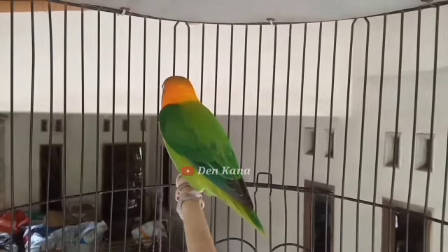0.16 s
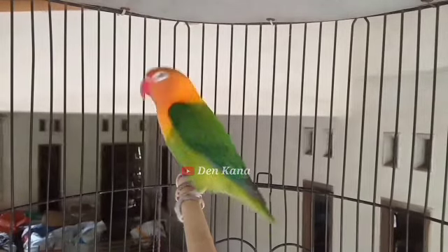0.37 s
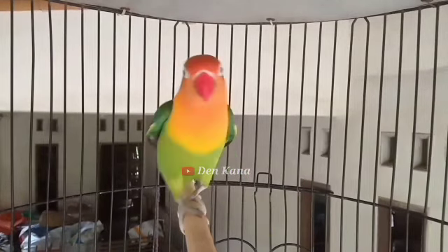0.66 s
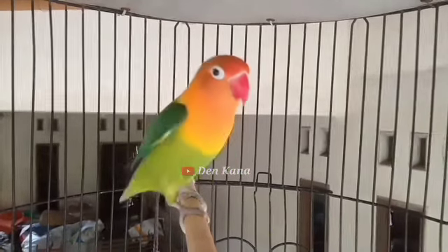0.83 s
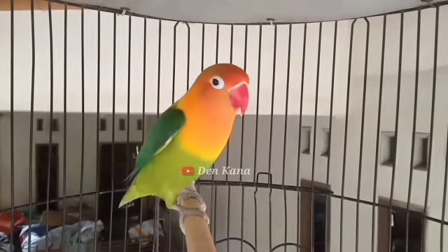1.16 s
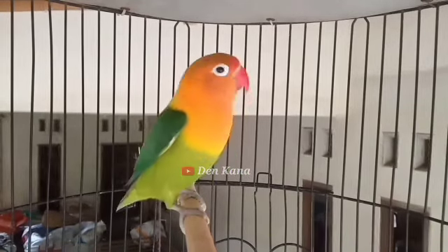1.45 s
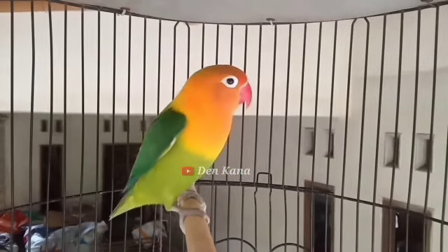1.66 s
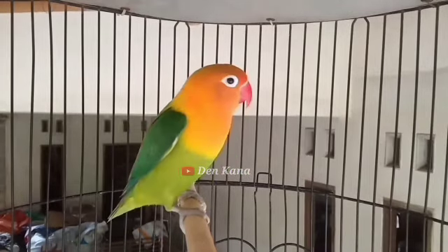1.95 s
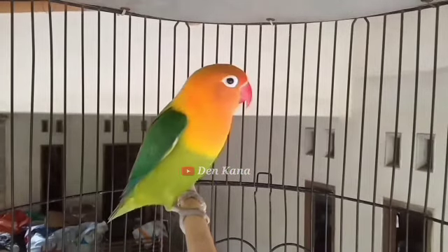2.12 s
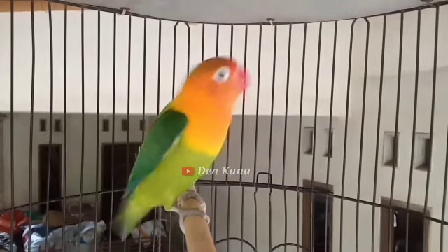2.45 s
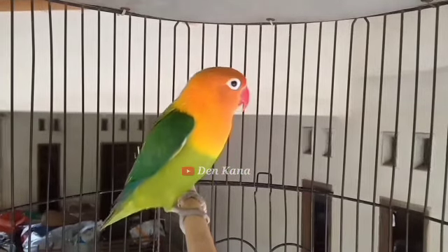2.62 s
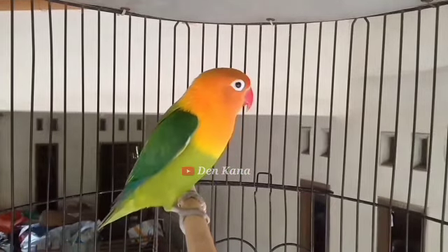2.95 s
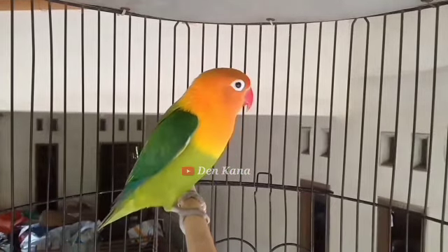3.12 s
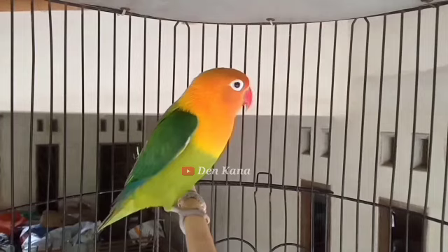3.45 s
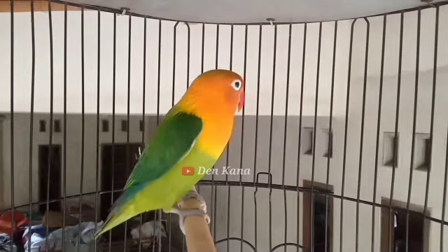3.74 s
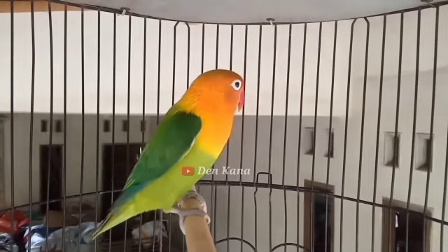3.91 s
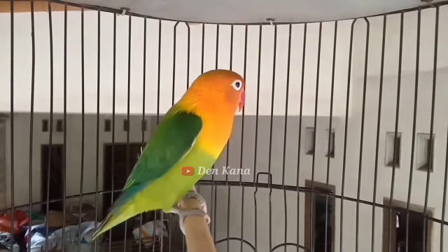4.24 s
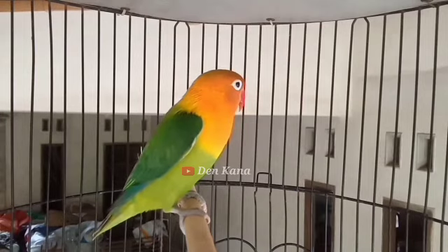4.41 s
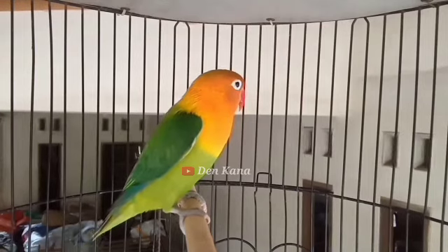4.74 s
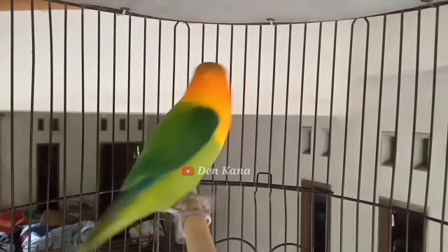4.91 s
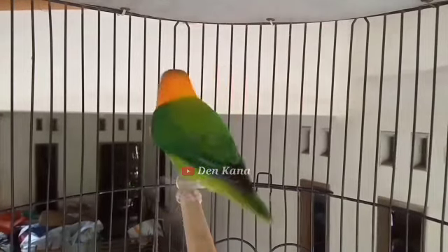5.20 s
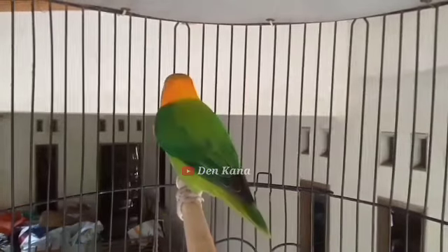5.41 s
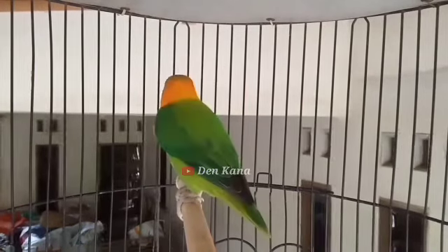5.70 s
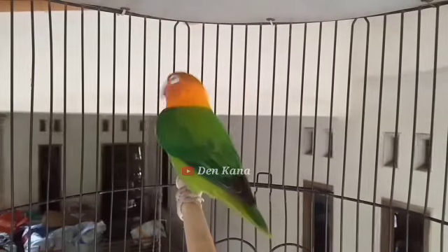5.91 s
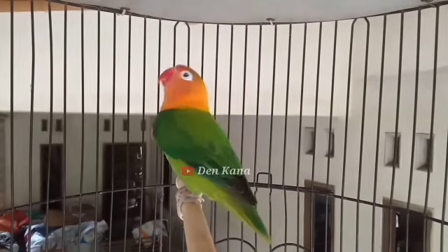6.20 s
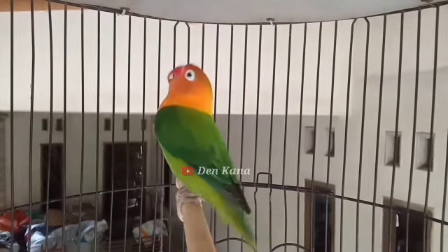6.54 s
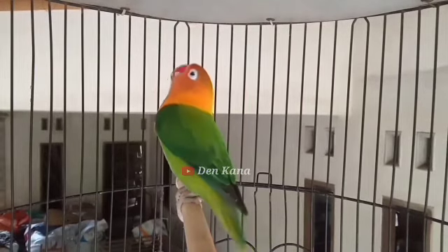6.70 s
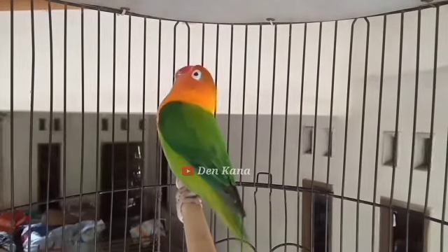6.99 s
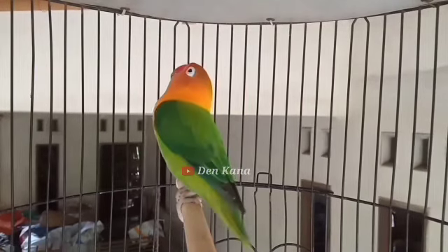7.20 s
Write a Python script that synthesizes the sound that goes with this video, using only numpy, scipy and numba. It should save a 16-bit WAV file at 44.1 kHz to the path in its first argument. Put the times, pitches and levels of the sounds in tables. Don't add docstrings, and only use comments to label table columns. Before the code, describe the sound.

A close phone microphone picks up a caged lovebird in a hard, echoing room. Under everything lie quiet house rumble, a wavering low drone around 140-170 Hz, faint hiss and insect-thin high tones. At 0.55 s comes a tiny, piercing chirp around 5 kHz, with a bright tail lasting over half a second; faint claw ticks follow near 0.8 s. A second, rougher chirp sweeps upward at 1.6 s, a third strikes at 2.57 s and a fourth at 3.7 s, each only some tens of milliseconds long. From about 3 s a distant machine's thin whine swells very faintly, strongest near 5.5 s, gone by 6.1 s. Small ticks sound around 5.0 and 5.3 s. At 6.1 s a quick double note leads, from 6.3 s, into rapid, raspy chatter, about sixteen short rising strokes per second with softer grace clicks, slightly duller, continuing until the end at about 7.4 s.

```python
import sys
import numpy as np
from scipy import signal
from scipy.fft import rfft, irfft
from scipy.io import wavfile
from scipy.ndimage import uniform_filter1d, minimum_filter1d
from numba import njit

SR = 44100
rng = np.random.default_rng(int(sys.argv[2]) if len(sys.argv) > 2 else 0)


def transcribe(signal):
    frames = np.atleast_2d(signal).T
    limited = np.clip(frames, -1, 1)
    pcm = np.round(limited * 32767).astype(np.int16)
    wavfile.write(sys.argv[1], SR, pcm)


def voltage_ratio(level):
    return 10 ** (np.asarray(level, float) / 20)


N = 324576
TIME = np.arange(N) / SR

# [f/Hz, density/dB]
HOUSE_COLOUR = [(15, -62), (25, -51), (76, 5), (206, -5), (373, -6.5), (439, -7), (734, -11), (1290, -12),
                (2990, -20.5), (3430, -17.5), (4250, -26.5), (7920, -25), (11600, -40), (13600, -32.5),
                (16000, -62)]
# [t/s, level/dB]
HOUSE_LEVEL = [(0, -54), (2.4, -55), (3.3, -55), (4.2, -56), (5.8, -57.5), (7.36, -62.5)]
# [start t/s, end t/s, start f/Hz, end f/Hz, level/dB]
DRONE_SPELLS = [(0, 0.495, 167, 167, -61.5), (0.604, 1.407, 142, 142, -61), (1.522, 2.5, 167, 160.9, -59),
                (2.607, 3.446, 160, 155.8, -51.5), (3.455, 4.201, 155, 150.7, -61.5),
                (4.29, 5.104, 146, 139, -56.5), (5.303, 6.352, 162, 157.2, -60),
                (6.359, 7.398, 157, 158, -68)]
# [f/Hz, width/Hz, level/dB to the second chirp, level/dB after]
STEADY_TONES = [(204.6, 0.89, -61.5, -87.5), (354, 1.1, -75, -71.5), (416, 6.2, -63.5, -91),
                (447.6, 10, -62.5, -69.5), (3359, 33, -68.5, -72), (7900, 30, -76.5, -96.5),
                (10000, 20, -89.5, -98), (13160, 25, -90.5, -90), (13450, 40, -77, -75)]
# [f/Hz, level/dB]
MACHINE_LINES = [(2923, -72.5), (3074, -75), (3418, -80), (4070, -82.5), (5227, -89), (6837, -79),
                 (7434, -78), (8818, -74.5), (9216, -79), (10126, -81.5), (10460, -87.5), (11041, -81),
                 (11364, -87), (12080, -101), (13517, -89), (14153, -93.5)]
# [f/Hz, density/dB]
MACHINE_HISS = [(1180, -45), (2000, -22), (2620, -8.5), (3010, -3), (4940, -23), (8930, -11.5),
                (12700, -23.5), (13800, -15), (16000, -38)]
# [t/s, level/dB]
MACHINE_LEVEL = [
    (2.6, -79),
    (3.1, -67.5),
    (4, -64),
    (4.6, -63),
    (5.5, -59),
    (5.75, -66),
    (6.1, -80),
]
# [f/Hz, t60/s, level/dB]
ROOM_TAIL = [(1500, 0.62, -17), (2500, 1, -10), (4000, .75, -7), (5500, 0.62, -4), (8100, 0.59, -3.5),
             (8800, 0.66, -14), (13600, 0.25, -8.5)]
ROOM_SEND = [
    -3.15,
    -3.5,
    0.66,
    0.3,
    -0.28,
    -2.9,
]
ROOM_SEND_FROM = (0, 1.5, 2.4, 3.5, 6, 6.29)
# [delay/ms, share]
NEAR_ECHOES = [(.78, 0.062), (1.58, 0.59), (1.72, -0.22), (1.82, 0.46), (3.3, 0.1), (4.45, -0.17),
               (6.0, -0.18), (9.5, 0.13), (24.5, 0.14), (40.5, 0.048), (43.5, -0.052)]
# [t/s, peak level/dB, f/Hz]
CLAW_TICKS = [(0.519, -41, 1897), (.75, -51, 11860), (.82, -51, 11300), (0.841, -55, 11300),
              (2.540, -36.5, 2358), (2.569, -42.5, 1097), (3.703, -27.5, 1300), (1.614, -34, 2090),
              (5.018, -47, 9000), (5.27, -51, 9200)]
# [f/Hz, gain/dB]
UPPER_COLOUR = [(1000, -32), (2000, -12.5), (3500, -11), (5000, -9.5), (6200, -25), (7700, 4), (9000, -1.5),
                (11000, -6), (13000, 3.5), (15500, -10)]
HALF_PITCH_LINES = (-17, 0, -13)
# [t/s, length/ms, start f/Hz, end f/Hz, level/dB]
SUNG_NOTES = [(.5506, 9, 5840, 4330, -13), (.5556, 10.8, 5830, 5290, -14), (.5612, 6.7, 5340, 5570, -17.5),
              (1.6139, 8.1, 1916, 3014, -24.5), (1.617, 13, 3215, 3745, -27), (1.6207, 10, 4600, 5114, -14),
              (1.6258, 21.5, 5236, 4804, -15.5), (2.567, 5.7, 4500, 4990, -37.5),
              (2.5718, 4.8, 5000, 5060, -25.5), (2.5749, 24.7, 4630, 5442, -11),
              (3.7015, 10, 4830, 4826, -29.5), (3.708, 6, 4830, 5750, -24), (3.7118, 31, 4600, 5453, -11),
              (6.117, 7, 4010, 2100, -15.5), (6.1196, 17.8, 2260, 1734, -22.5)]
# [overtone level/dB, half-pitch lines level/dB]
NOTE_VOICES = [(-16, -22.5), (-14, -18.5), (-12, -30.5), (-7.5, 1), (18.5, -11.5), (-9, -18), (6, -32),
               (4.5, 20), (-6, -5.5), (1.5, -31.5), (-15, 10.5), (-9.5, -15), (-2.5, -28.5), (-5, -38),
               (8.5, -26)]
NOTE_ROUGHNESS = (.1, .07, .05, .5, .06, .07, .03, .18, .1, .03, .3, .2, .03, .08, .06)
# [t/s, length/ms, start f/Hz, top f/Hz, level/dB]
CHATTER_BEATS = [(6.1065, 3.44, 3280, 4960, -11.5), (6.2975, 3.9, 2260, 3450, -17),
                 (6.3573, 7.1, 1710, 4280, -14.5), (6.4185, 4.25, 2450, 4160, -14),
                 (6.4792, 4.1, 2860, 5500, -10.5), (6.5397, 6.5, 2110, 5500, -13),
                 (6.6024, 6.1, 3180, 3940, -11), (6.6659, 4.34, 1640, 4840, -12),
                 (6.7281, 4.9, 1730, 4540, -13), (6.794, 6.2, 1670, 4690, -11.5),
                 (6.855, 3.6, 1700, 4850, -14), (6.9199, 4.74, 2210, 3670, -15),
                 (7.0557, 3.3, 3010, 4050, -12), (7.1249, 4.7, 1720, 4080, -16),
                 (7.1899, 5.1, 3060, 3770, -12), (7.2612, 4.8, 1820, 4080, -15),
                 (7.3285, 3.9, 1710, 4080, -16.5), (6.4684, 3.4, 2700, 4500, -22.5),
                 (6.7156, 4.8, 3000, 5000, -20), (6.8444, 2.9, 2970, 4560, -14),
                 (6.9093, 3, 2720, 4370, -22), (7.178, 4.9, 3070, 4500, -16.5)]
# [t/s, length/ms, f/Hz, level/dB]
GRACE_STROKES = [(6.1022, 3, 2580, -14), (6.525, 8.7, 3060, -14), (6.5908, 4.8, 2645, -17.5),
                 (6.647, 5.6, 2510, -30.5), (6.654, 4.3, 2780, -19), (6.781, 3.3, 3100, -14),
                 (6.8403, 3, 2550, -23.5), (6.8505, 7.3, 2430, -22.5), (6.9635, 3.3, 2340, -40),
                 (6.9739, 3.4, 2600, -22), (6.9873, 4.4, 2500, -11.5), (7.0425, 3.6, 4260, -15.5),
                 (7.1067, 4.5, 2530, -27.5), (7.11, 9.3, 2984, -13), (7.163, 3.6, 2130, -28),
                 (7.237, 3.5, 2400, -25), (7.2437, 2.8, 2650, -26), (7.247, 3.8, 2980, -14),
                 (7.304, 5.7, 1970, -44), (7.31, 6, 2500, -25), (7.3156, 3.9, 2890, -18)]

HISS_DB, HISS_FOLLOWS, HISS_EARLY_DB, HISS_FADE_S = -59, 0.25, 3, 2.7
DRONE_FADE_S = 0.15
LINE_WIDTH = 0.0037
MACHINE_LINES_DB = -1
GAIN_TOP_DB, GAIN_RATIO, GAIN_ATTACK_S, GAIN_RELEASE_S = -29.5, 1.1, 0.003, 0.25
AWAY_S, AWAY_HZ, AWAY_SHARE, AWAY_ROOM_SHARE = 6, 7660, 0.64, 0.25
RASP_TOP_HZ, THROAT_HZ = 9000, 2090

NOTE_FALL_DB = -5
NOTE_ATTACK_MS, NOTE_RELEASE_MS, NOTE_SAG_DB_MS = 2.4, 3.5, -0.3953
GLIDE_SHARE = .22
OVERTONE_PEAK, OVERTONE_LATE_DB = 0.44, -12
ONSET_MS, ONSET_HALF_DB, ONSET_ROUGH = 3.5, 17, .3

CHATTER_DB, CHATTER_FALL_DB, CHATTER_HALF_DB, CHATTER_ROUGH = 0.5, -6, -16, .3
RASP_DB = -8.5
SCOOP, SCOOP_MS = .22, .8
GRACE_SAG = 0.018
# (pitch where both are equal/Hz, dB per kHz)
BEAT_OVERTONE, GRACE_OVERTONE, OVERTONE_FLOOR_DB = (2080, -8), (2580, -31), -11.5

SQUARE = 0.038
PEAK, LIMIT_MS = .68, 1.2
TOP_HZ = 15450


def curve(table, column):
    return np.interp(TIME, [row[0] for row in table], [row[column] for row in table])


def unit(x):
    return x / np.sqrt(np.mean(x ** 2))


def lowpass(x, hz):
    return signal.sosfilt(signal.butter(2, hz, fs=SR, output="sos"), x)


def coloured(points):
    hz, db = np.transpose(points)
    bins = np.log(np.fft.rfftfreq(N, 1 / SR) + 1)
    gain = voltage_ratio(np.interp(bins, np.log(hz), db))
    return unit(irfft(rfft(rng.standard_normal(N)) * gain, N))


def ring(hz, width):
    bins = np.fft.rfftfreq(N, 1 / SR)
    resonance = 1 / (1 + (2 * (bins - hz) / width) ** 2)
    return unit(irfft(rfft(rng.standard_normal(N)) * resonance, N))


def walk(rate, count=N):
    k = max(int(SR / rate), 1)
    steps = np.repeat(rng.standard_normal(count // k + 1), k)
    return 1.845 * uniform_filter1d(uniform_filter1d(steps, k), k)[:count]


def house_noise():
    air = coloured(HOUSE_COLOUR)
    low = lowpass(air, 600)
    house_db = curve(HOUSE_LEVEL, column=1)
    early_db = HISS_EARLY_DB * np.exp(-TIME / HISS_FADE_S)
    hiss_db = HISS_DB + HISS_FOLLOWS * (house_db - house_db.mean()) + early_db
    rumble = unit(low) * voltage_ratio(house_db + 0.48 * walk(1.6))
    return rumble + unit(air - low) * voltage_ratio(hiss_db + 0.59 * walk(20.0))


def drone():
    out = np.zeros(N)
    waver_hz, flicker_db = 1.4 * walk(8), 2.1 * walk(29)
    for start, end, start_hz, end_hz, db in DRONE_SPELLS:
        hz = np.interp(TIME, [start, end], [start_hz, end_hz]) + waver_hz
        phase = 2 * np.pi * np.cumsum(hz) / SR
        fade = np.clip(np.minimum(TIME - start, end - TIME) / DRONE_FADE_S + .5, 0, 1)
        out += np.sqrt(2) * np.sin(phase) * fade * voltage_ratio(db + flicker_db)
    return out


def steady_tones():
    out = np.zeros(N)
    for hz, width, early_db, late_db in STEADY_TONES:
        out += ring(hz, width) * voltage_ratio(np.interp(TIME, [1.55, 1.7], [early_db, late_db]))
    return out


def far_machine():
    lines = unit(sum(voltage_ratio(db) * ring(hz, LINE_WIDTH * hz) for hz, db in MACHINE_LINES))
    hiss = coloured(MACHINE_HISS) * voltage_ratio(.7 * walk(0.64))
    swell = voltage_ratio(curve(MACHINE_LEVEL, column=1))
    return swell * machine_mix(lines, hiss)


def room_response():
    t = TIME[:SR]
    response = np.zeros(SR)
    unevenness_db = 8 * rng.standard_normal(SR) * np.exp(-t / .04)
    spectrum = rfft(rng.standard_normal(SR) * voltage_ratio(unevenness_db))
    place = np.log(np.fft.rfftfreq(SR, 1 / SR) + 1)
    centres = np.log([row[0] for row in ROOM_TAIL])
    for k, (hz, t60, db) in enumerate(ROOM_TAIL):
        share = np.interp(place, centres, np.arange(len(ROOM_TAIL)) == k)
        band = irfft(spectrum * share, SR)
        fade = np.exp(-np.log(1000) * t / t60) * (1 - np.exp(-t / 0.0098))
        response += voltage_ratio(db) * band * fade / np.sqrt(np.sum(fade ** 2))
    return response


def near_response():
    response = np.zeros(2048)
    response[0] = 1
    for ms, share in NEAR_ECHOES:
        response += share * np.sinc(np.arange(2048) - ms * SR / 1000)
    return response


@njit
def follow(size, attack, release):
    out, e = np.empty(len(size)), 0.
    for i in range(len(size)):
        e += (size[i] - e) * (attack if size[i] > e else release)
        out[i] = e
    return out


def gain_control(bird):
    heard = follow(np.abs(bird), 1 / (GAIN_ATTACK_S * SR), 1 / (GAIN_RELEASE_S * SR))
    return np.minimum(1, voltage_ratio(GAIN_TOP_DB) / (heard + 1e-9)) ** (1 - 1 / GAIN_RATIO)


def ticks():
    out, t = np.zeros(N), TIME[:400]
    for s, db, hz in CLAW_TICKS:
        edges = [hz / 2.5, min(hz * 1.6, .4 * SR)]
        band = signal.butter(2, edges, "band", fs=SR, output="sos")
        burst = signal.sosfilt(band, rng.standard_normal(len(t)))
        out[int(s * SR):][:len(t)] += voltage_ratio(db) * unit(burst) * np.exp(-t / 0.001)
    return out


def upper_gain(hz):
    beak_hz, db = np.transpose(UPPER_COLOUR)
    return voltage_ratio(np.interp(np.log(hz), np.log(beak_hz), db))


def syrinx(hz, overtone_db, half_db, rough, fall_db):
    shake, flutter = walk(2500, count=2048)[:len(hz)], walk(1800, count=2048)[:len(hz)]
    shaken_hz = hz * (1 + 0.076 * rough * shake)
    phase = 2 * np.pi * (np.cumsum(shaken_hz) / SR + rng.random())
    voice = np.sin(phase) + voltage_ratio(overtone_db) * np.sin(2 * phase)
    for k in range(3, 8):
        level = upper_gain(k * hz) * voltage_ratio(overtone_db + (k - 2.5) * fall_db)
        voice = voice + (k * hz < .4 * SR) * level * np.sin(k * phase)
    for k, line_db in enumerate(HALF_PITCH_LINES):
        voice = voice + voltage_ratio(half_db + line_db) * np.sin((k + .5) * phase)
    return voice * (1 + rough * flutter)


def chatter(rasp):
    out = np.zeros(N)
    strokes = [row + (BEAT_OVERTONE,) for row in CHATTER_BEATS]
    for s, ms, hz, db in GRACE_STROKES:
        strokes.append((s, ms, hz, hz * (1 - GRACE_SAG), db, GRACE_OVERTONE))
    for s, ms, start_hz, end_hz, db, (even_hz, slope) in strokes:
        share = np.arange(int(ms * SR / 1000)) / (ms * SR / 1000)
        at = int(s * SR) + np.arange(len(share))
        scoop = 1 - SCOOP * np.exp(-share * ms / SCOOP_MS)
        hz = (start_hz + (end_hz - start_hz) * share) * scoop
        overtone_db = max(slope * (start_hz - even_hz) / 1000, OVERTONE_FLOOR_DB)
        strong_db = max(overtone_db, 0)
        voice = syrinx(hz, overtone_db, CHATTER_HALF_DB + strong_db, CHATTER_ROUGH, CHATTER_FALL_DB)
        voice = voice * voltage_ratio(-strong_db) + voltage_ratio(RASP_DB) * rasp[at]
        out[at] += voltage_ratio(db + CHATTER_DB) * np.sin(np.pi * share ** .7) * voice
    return out


def notes(rasp):
    out = np.zeros(N)
    for note, (overtone_db, half_db), rough in zip(SUNG_NOTES, NOTE_VOICES, NOTE_ROUGHNESS):
        s, ms, start_hz, end_hz, db = note
        t = np.arange(int(ms * SR / 1000)) * 1000 / SR
        at = int(s * SR) + np.arange(len(t))
        hz = end_hz + (start_hz - end_hz) * np.exp(-t / (GLIDE_SHARE * ms))
        unsteady = np.exp(-t / ONSET_MS)
        from_peak = (t / ms - OVERTONE_PEAK) / (1 - OVERTONE_PEAK)
        upper_db = overtone_db + OVERTONE_LATE_DB * from_peak ** 2
        lines_db = half_db + ONSET_HALF_DB * unsteady * (half_db < 0)
        shaky = rough + ONSET_ROUGH * unsteady
        strongest = voltage_ratio(np.maximum(0, np.maximum(upper_db, lines_db)))
        voice = syrinx(hz, upper_db, lines_db, shaky, NOTE_FALL_DB)
        voice = voice + 1.4 * shaky * strongest * rasp[at]
        ends = np.clip(np.minimum(t / NOTE_ATTACK_MS, (ms - t) / NOTE_RELEASE_MS), 0, 1)
        out[at] += np.sin(np.pi / 2 * ends) ** 2 * voltage_ratio(db + NOTE_SAG_DB_MS * t) * voice
    return out


def machine_mix(lines, hiss):
    return lines * voltage_ratio(MACHINE_LINES_DB) + hiss


def parrot():
    rasp = lowpass(coloured(UPPER_COLOUR), RASP_TOP_HZ)
    throat = signal.butter(6, THROAT_HZ, "high", fs=SR, output="sos")
    return notes(rasp) + ticks() + signal.sosfilt(throat, chatter(rasp))


def scene():
    voice = parrot()
    lost = (TIME > AWAY_S) * (lowpass(voice, AWAY_HZ) - voice)
    direct = voice + AWAY_SHARE * lost
    send_db = np.array(ROOM_SEND)[np.searchsorted(ROOM_SEND_FROM, TIME, "right") - 1]
    sent = voltage_ratio(send_db) * (voice + AWAY_ROOM_SHARE * lost)
    near = signal.fftconvolve(direct, near_response())[:N]
    bird = near + signal.fftconvolve(sent, room_response())[:N]
    background = house_noise() + drone() + steady_tones() + far_machine()
    return (bird + gain_control(bird) * background)[None]


def band_limit(x):
    return signal.sosfilt(signal.butter(12, 16480, fs=SR, output="sos"), x)


def record(dry):
    dry = dry + SQUARE * dry ** 2
    span = int(LIMIT_MS * SR / 1000)
    held_peak = -minimum_filter1d(-np.abs(dry), size=span)
    size = uniform_filter1d(held_peak, size=span)
    rounded = dry / (1 + (size / PEAK) ** 4) ** .25
    cut = signal.sosfilt(signal.ellip(8, .2, 45, TOP_HZ, fs=SR, output="sos"), rounded)
    return band_limit(cut)


dry = scene()
out = record(dry)
transcribe(out)
```